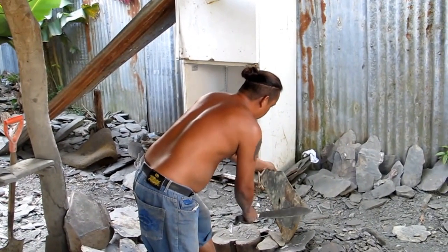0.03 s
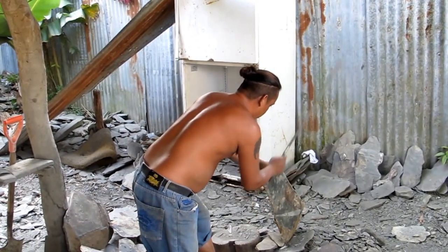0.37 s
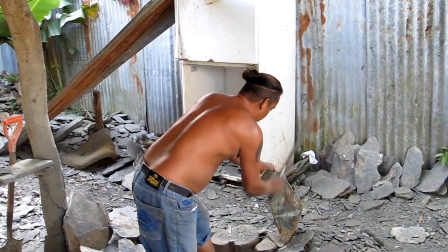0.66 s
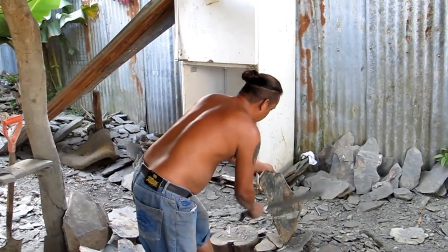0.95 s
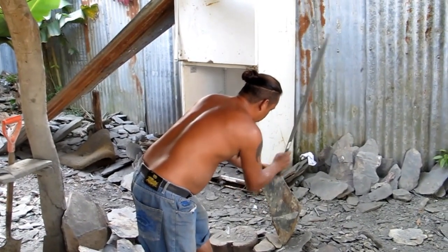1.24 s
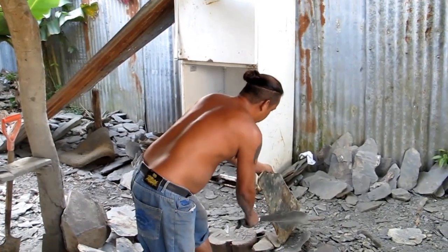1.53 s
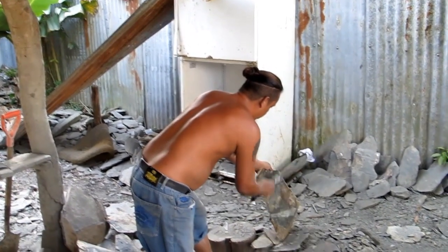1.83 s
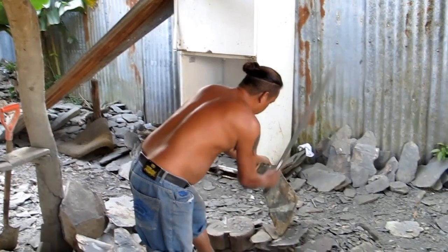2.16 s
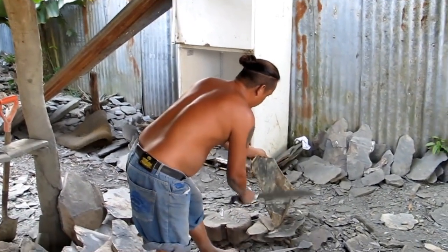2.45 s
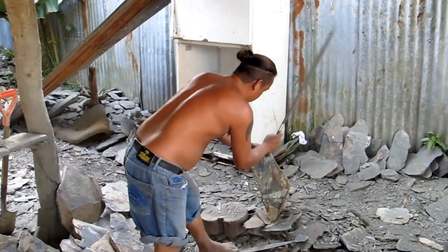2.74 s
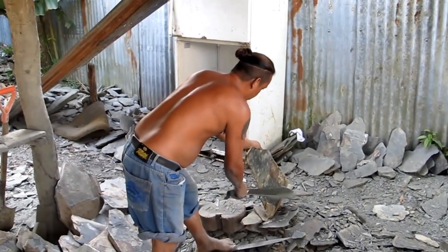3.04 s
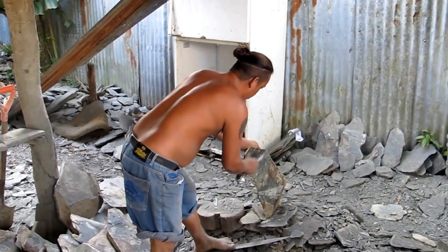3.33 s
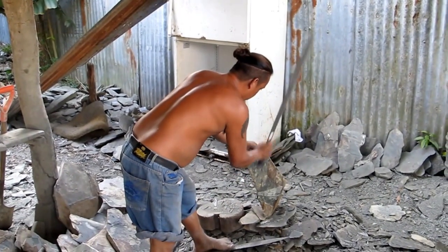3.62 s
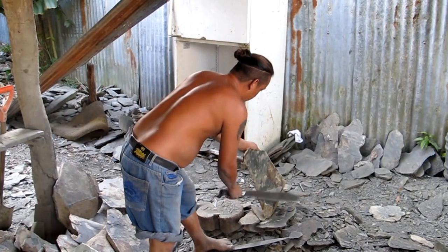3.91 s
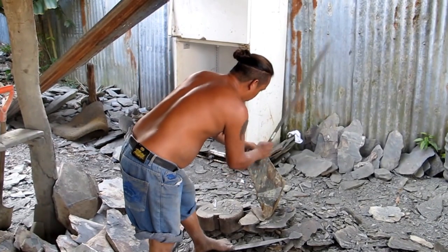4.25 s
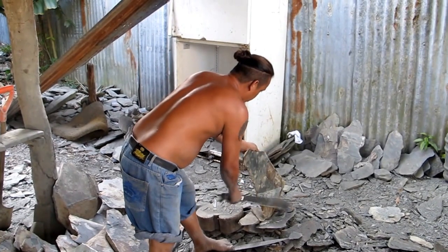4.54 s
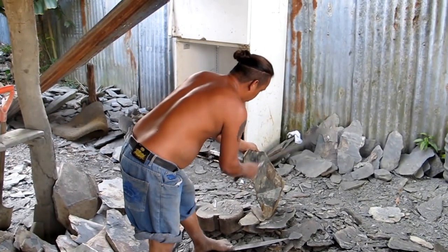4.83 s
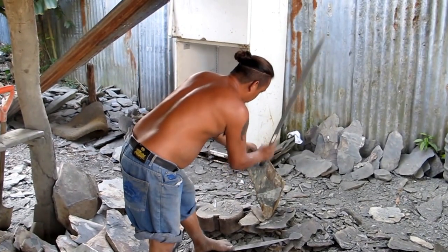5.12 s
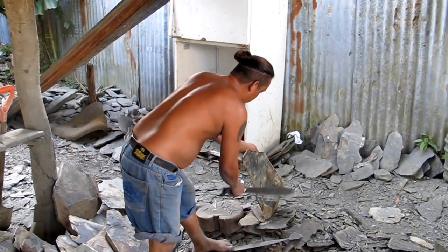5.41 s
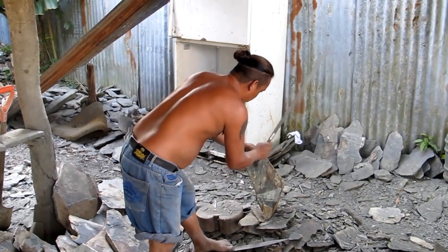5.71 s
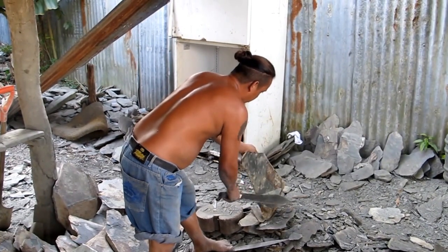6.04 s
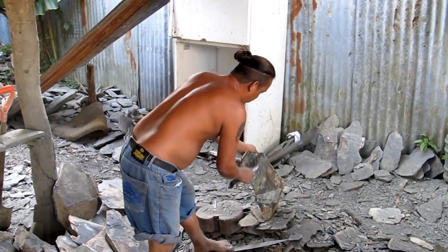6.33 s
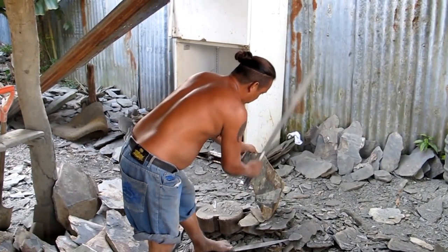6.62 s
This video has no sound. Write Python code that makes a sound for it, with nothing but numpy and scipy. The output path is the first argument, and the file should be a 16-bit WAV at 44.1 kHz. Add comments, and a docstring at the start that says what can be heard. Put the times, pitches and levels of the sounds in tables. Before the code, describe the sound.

A steel blade chops a stone slab in nine evenly paced, ringing blows outdoors, with chips pattering onto rubble.

```python
"""A long steel blade trims a hand-held slate slab near the microphone: nine evenly paced blows.
Each cracks the stone, knocks the slab and leaves the blade singing; chips patter onto the rubble,
and the yard's sheet-metal walls throw back a short tail. Far off, two birds call and an engine passes.
Towards the end a breeze buffets the two microphone ports. The recorder's gain ducks under the blows."""
import sys
import numpy as np
from scipy import signal
from scipy.fft import rfft, irfft, next_fast_len
from scipy.io import wavfile
from scipy.ndimage import map_coordinates

SR = 44100
rng = np.random.default_rng(int(sys.argv[2]) if len(sys.argv) > 2 else 0)


def to_wav(sig):
    """Store sig (one row per channel, or 1-D mono) as 16-bit WAV at the path in sys.argv[1].

    Samples outside -1..1 are clipped; the rate is SR.
    """
    pcm = np.clip(np.atleast_2d(sig), -1, 1) * 32767
    pcm = np.round(pcm).astype(np.int16)
    wavfile.write(sys.argv[1], SR, pcm.T)  # frames by channels


N = 294014

# Blows of steel on slate, levels relative: t/s, stone level/dB, thud/dB, slab ring/dB, crunch t60/s,
# crunch treble/dB, then level/dB of each of the blade's four mode families
BLOWS = [(0.0494, -13.5, 1.5, 1.5, 0.17, 1, -54.5, -56.5, -63, -37),
         (0.8451, -12, 1.5, -0.5, 0.18, 3, -63, -36.5, -30, -36),
         (1.6048, -12, 0.5, -2, 0.093, -3.5, -65, -56, -69.5, -41),
         (2.3603, -14.5, -11.5, 0, 0.15, -1, -41.5, -38.5, -55, -30),
         (3.1244, -15.5, -5.5, 7.5, 0.14, -1.5, -59.5, -43.5, -40.5, -32),
         (3.8630, -11, -11.5, -3, 0.13, 4.5, -56, -62.5, -49.5, -35),
         (4.609, -12, -1, 0.5, 0.16, 0.5, -42.5, -46, -63, -24.5),
         (5.369, -13, -6.5, 2.5, 0.11, -4.5, -48.5, -44.5, -38.5, -30.5),
         (6.0827, -14, -4.5, 2, 0.1, 6.5, -54, -42.5, -35, -36)]


def amp(db):
    """Decibels to gain."""
    return 10 ** (np.asarray(db) / 20)


def unit(x):
    """x at rms 1."""
    return x / np.sqrt(np.mean(x ** 2) + 1e-20)


def along(points, hz):
    """A curve of (f/Hz, value) points, read on a log frequency axis."""
    freqs, values = np.transpose(points)
    return np.interp(np.log(hz + 1), np.log(freqs + 1), values)


def fade(t, t60):
    """A decay that loses 60 dB in t60 seconds."""
    return amp(-60 * t / t60)


def add(track, s, sound):
    """Mix a sound into the track at time s."""
    start = max(round(s * SR), 0)
    part = sound[..., :max(N - start, 0)]
    track[..., start:start + part.shape[-1]] += part


def wobble(knots):
    """A smooth random curve, read at positions counted in knots."""
    return map_coordinates(rng.standard_normal(int(knots.max()) + 4), [knots], mode="nearest")


def noise(spectrum, size, independent=False):
    """Coloured stereo noise of rms 1; unless independent, the two ports hear the bass alike."""
    # Likeness of the sound at the two ports: f/Hz, correlation
    likeness = [(100, 0.96), (600, 0.95), (1400, 0.74), (3100, 0.19), (6800, -0.23), (15000, 0.93)]
    hz = np.fft.rfftfreq(size, 1 / SR)
    correlation = np.zeros_like(hz) if independent else along(likeness, hz)
    width = np.arccos(correlation) / 2
    coloured = rfft(rng.standard_normal((2, size))) * amp(along(spectrum, hz))
    mid, side = irfft(coloured * [np.cos(width), np.sin(width)], size)
    return unit(np.array([mid + side, mid - side]))


def tone(hz, t):
    """A sine from right of centre: it reaches the left port a little late."""
    delay_s = np.array([[5e-5], [0]])
    return np.sin(2 * np.pi * (hz * (t - delay_s) + rng.random()))


def open_air():
    """Soft outdoor noise all round the microphone, over a low rumble that drifts in level."""
    # Spectra of the air and the rumble: f/Hz, level/dB
    air_colour = [(20, -6.5), (60, 1.5), (100, -2.5), (140, -9.5), (200, -11), (400, -15.5), (650, -15.5),
                  (1000, -24), (1500, -23), (3000, -33.5), (6000, -30.5), (9000, -33.5), (15000, -32.5)]
    rumble_colour = [(25, -7.5), (70, -1), (160, -3.5), (300, -13.5), (700, -17.5), (1500, -34),
                     (6000, -63)]
    t = np.arange(N) / SR
    air = amp(-57 + 0.82 * wobble(3 * t)) * noise(air_colour, N)
    rumble = amp(-62.5 + 2.4 * wobble(5 * t)) * noise(rumble_colour, N)
    return air + rumble


def slate():
    """Close blows: a crack and a thud at contact, a crunch as the edge flakes, a short slab ring."""
    # Spectra of the stone's noises: f/Hz, level/dB
    crack_colour = [(500, -13), (2000, -14.5), (5000, -2.5), (9000, 7), (15000, -1.5)]
    thud_colour = [(60, -13), (200, -14.5), (400, -8.5), (700, 5), (1400, -8.5), (2500, -7.5), (6000, -18)]
    crunch_colour = [(100, -37.5), (300, -12), (600, -12.5), (1000, -11.5), (1600, 4), (2300, 4.5),
                     (2800, -2.5), (4000, 2), (5500, 2.5), (8000, -0.5), (15000, -1)]
    clatter_colour = [(300, -12), (900, -7.5), (1300, 1.5), (1700, -7), (2200, -8.5), (2800, -20.5),
                      (6000, -27)]
    # Modes of the slab: f/Hz, level/dB, t60/s
    slab_modes = [(536, -22, 0.068), (690.4, -15, 0.19), (814, -4.5, 0.056), (1107, -7.5, 0.13),
                  (1257, 5.5, 0.032), (1468, 1, .1), (1661, -7, 0.083), (1667, -5.5, 0.092),
                  (1920, -9, 0.11), (2106, -9.5, 0.19), (3300, -15.5, 0.063), (5400, -2, 0.056),
                  (5400, -3.5, 0.087)]
    out = np.zeros((2, N))
    t = np.arange(SR // 3) / SR
    for s, db, thud_db, slab_db, crunch_t60, treble_db, *_ in BLOWS:
        crack = amp(2.5) * fade(t, 0.039) * noise(crack_colour, len(t))
        thud = amp(thud_db - 9) * fade(t, 0.045) * noise(thud_colour, len(t))
        fractures = unit(amp(2 * wobble(900 * t)))  # the stone gives way in tiny steps
        # a cleaner break is brighter
        break_colour = [(hz, level + treble_db * (hz > 7000)) for hz, level in crunch_colour]
        crunch = amp(-0.5) * fractures * fade(t, crunch_t60) * noise(break_colour, len(t))
        # the slab's pitches shift a little with the grip, and its loose layers clatter
        ring = sum(amp(level + rng.normal(0, 2.7)) * fade(t, t60) * tone(hz * rng.normal(1, 0.01), t)
                   for hz, level, t60 in slab_modes)
        clatter = amp(2.5) * (1 - np.exp(-t / 0.015)) * fade(t, 0.13) * noise(clatter_colour, len(t))
        slab = amp(slab_db - 15) * (ring + clatter)
        attack = 1 - np.exp(-t / 0.0009)
        add(out, s, amp(db) * attack * (crack + thud + crunch + slab))
    return out


def blade():
    """The steel sings until the next contact stops it; the tones flutter once the arm swings it up."""
    # Modes of the blade: f/Hz, level/dB, t60/s
    blade_modes = [(2390, -1, 4.2), (2878, -.5, 1.8), (3359, -4.5, 1.05), (3850, -8, .24), (4288, -4, .66),
                   (4703, -6, .63), (5087, -4.5, .6), (5846, -11, .65), (6223, -6, .62), (6587, -1, .45),
                   (6132, 0, .5), (6897, -1.5, .38), (7620, -1.5, .34), (8380, -6, .3)]
    # Family of each mode, 0-3: a point of contact excites a family together
    families = [0, 1, 1, 2, 2, 2, 2, 2, 2, 2, 3, 3, 3, 3]
    swing_s, sound_m_per_s = 0.2938, 343
    out = np.zeros((2, N))
    ends = [blow[0] for blow in BLOWS[1:]] + [N / SR]
    for blow, end in zip(BLOWS, ends):
        s, family_db = blow[0], blow[-4:]
        t = np.arange(int((end - s) * SR)) / SR
        swing = np.clip(t / swing_s, 0, 1) ** 2
        travel_m = np.cumsum(1.3 + 3 * swing + 5 * t) / SR
        gate = np.clip(t / 0.002, 0, 1) * np.clip((t[-1] - t) / 0.0021, 0, 1)
        swell = amp(2 * swing + 0.14)  # the ring swells slightly just after each blow
        for (hz, db, t60), family in zip(blade_modes, families):
            # wall reflections change strength and phase with every wavelength travelled
            wavelengths = travel_m * hz / sound_m_per_s
            paths = np.array([wobble(wavelengths) + 1j * wobble(wavelengths) for port in range(2)])
            reflected = (0.35 + 0.3 * swing) * np.real(paths * np.exp(2j * np.pi * hz * t))
            direct = (0.8 - 0.35 * swing) * tone(hz, t)
            envelope = amp(db + family_db[family]) * gate * swell * fade(t, t60)
            add(out, s, envelope * (direct + reflected))
    return out


def yard(x):
    """Walls and rubble scatter the sound into a short tail, a fresh one for each blow."""
    # Reverberation of the yard: f/Hz, t60/s
    decay_times = [(150, 0.95), (700, 0.31), (1700, 0.29), (5500, 0.32), (9000, 0.47), (15000, .18)]
    tail_colour = [(200, 0.5), (1700, 6.5), (6000, 3.5), (15000, -15.5)]  # f/Hz, level/dB
    out = np.zeros((2, N))
    cuts = [0] + [round((blow[0] - 0.01) * SR) for blow in BLOWS[1:]] + [N]
    for start, end in zip(cuts, cuts[1:]):
        hz, t, bands = signal.stft(noise(tail_colour, SR // 2), SR, nperseg=256)
        envelope = fade(t, along(decay_times, hz)[:, None]) * (1 - np.exp(-t / 0.002))
        _, tail = signal.istft(bands * envelope, SR, nperseg=256)
        tail /= np.linalg.norm(tail[0])
        add(out, start / SR, signal.fftconvolve(x[:1, start:end], tail, axes=1))
    return out


def chip(db, clack_db):
    """A flake lands and rocks: a ragged tick, a few brief high modes, the clack of the stone beneath."""
    # Spectra of the flake and of the stone it hits: f/Hz, level/dB
    tick_colour = [(300, -27.5), (1500, -11), (3500, -11), (5500, 3), (9000, -1), (15000, -3)]
    clack_colour = [(200, -20), (750, 0), (2000, 0), (4000, -10), (9000, -30)]
    t = np.arange(SR // 10) / SR
    rocking = unit(amp(2.8 * wobble(350 * t)))
    tick = fade(t, 0.037) * rocking * noise(tick_colour, len(t))
    clink = 0.46 * fade(t, 0.045) * sum(tone(hz, t) for hz in rng.uniform(3000, 12000, size=4))
    clack = amp(clack_db) * fade(t, 0.06) * noise(clack_colour, len(t))
    attack = 1 - np.exp(-t / 0.0012)
    return amp(db) * attack * (tick + clink + clack)


def rubble(grains=60):
    """Below the slab, larger chips land and skip once; grit follows each blow, the later the fainter."""
    # Larger chips landing, levels relative: t/s, level/dB, clack/dB
    landings = [(0.403, -34.5, -24), (0.4199, -31, -25), (0.468, -38, -8), (0.5428, -33, -18),
                (1.173, -35.5, -29.5), (1.4058, -39, -21.5), (1.737, -25.5, -21), (1.8632, -39.5, -23.5),
                (2.5364, -28.5, -23), (2.5744, -33.5, -17), (2.6309, -33.5, -12), (2.7728, -43, -11.5),
                (3.2904, -36.5, -19), (3.4136, -38, -20), (3.4893, -34.5, -17), (4.347, -44.5, -31),
                (5.4975, -35.5, -15), (6.2446, -31, -22), (6.3826, -36, -22)]
    chip_trim_db, clack_trim_db = -2.5, 6.5
    skip_s, skip_loss_db = 0.022, 9.5
    grit_db, grit_spread_db, grit_fade_db_per_s = -52, 4, 20.5
    out = np.zeros((2, N))
    for s, db, clack_db in np.add(landings, [0, chip_trim_db, clack_trim_db]):
        add(out, s, chip(db, clack_db))
        add(out, s + skip_s * rng.uniform(0.85, 1.3), chip(db - skip_loss_db, clack_db))
    for s, *_ in BLOWS:
        falls_s = rng.uniform(0.073, 0.68, grains)
        levels_db = rng.normal(grit_db, grit_spread_db, grains) - grit_fade_db_per_s * falls_s
        for fall_s, db in zip(falls_s, levels_db):
            add(out, s + fall_s, chip(db, clack_db=-14.5))
    return out


def whistle(hz, length_s, fall):
    """A bird's thin, slightly rough note swells and fades while sliding from hz to hz * fall."""
    progress = np.linspace(0, 1, int(length_s * SR))
    pitch = hz * fall ** progress * (1 + 0.035 * wobble(60 * progress))
    return np.sin(np.pi * progress) * np.sin(2 * np.pi * np.cumsum(pitch) / SR)


def birds():
    """Two birds far from the microphone: one peeps in quick falls, the other holds lower notes."""
    # Calls of each bird: t/s, starting f/Hz, relative level/dB
    peeps = [(0.529, 3187, -61.5), (0.743, 4480, -58), (1.905, 3680, -59.5), (2.96, 3620, -62.5),
             (3.729, 4000, -69), (4.078, 2780, -65), (5.85, 3410, -63), (6.59, 3600, -62)]
    held_notes = [(0.569, 1076, -58.5), (1.071, 1037, -57.5), (2.909, 1022, -56.5)]
    out = np.zeros((2, N))
    for s, hz, db in peeps:
        add(out, s, amp(db) * whistle(hz, length_s=0.1, fall=0.65))
    for s, hz, db in held_notes:
        add(out, s, amp(db) * whistle(hz, length_s=0.14, fall=0.99))
    return out


def engine():
    """A distant engine passes: its low hum swells and fades with its nearness."""
    # Spectrum of the hum: f/Hz, level/dB
    hum_colour = [(60, -54.5), (100, -3), (112, -2), (125, -9), (190, -32), (600, -100)]
    nearest_s, half_power_s = 4.2, 0.45
    t = np.arange(N) / SR
    nearness = 1 / np.hypot(1, (t - nearest_s) / half_power_s)
    return amp(-52.5) * nearness * noise(hum_colour, N)


def wind():
    """A breeze buffets the ports, the right one harder; stronger flow sheds brighter eddies in puffs."""
    # Strength of the breeze: t/s, relative level/dB
    breeze = [(3.9, -56), (4.09, -62), (4.1, -50), (4.65, -71), (4.8, -71), (4.91, -47), (5.26, -52.5),
              (5.31, -45.5), (5.42, -54), (5.53, -39.5), (5.8, -38.5), (5.99, -33), (6.09, -41.5),
              (6.34, -47.5), (6.5, -37), (6.67, -40)]
    # Spectra of the turbulence at the ports: f/Hz, level/dB
    buffet_colour = [(15, -20.5), (40, 1), (90, 1.5), (150, -2), (250, -18), (500, -48.5), (1500, -60),
                     (5000, -110)]
    eddy_colour = [(40, -19.5), (150, 0.5), (260, -3), (500, -18), (1000, -41.5), (4000, -63.5)]
    full_gust_db, lee_db, windward_db = -35, -42, -30.5  # relative levels
    t = np.arange(N) / SR
    times, strength_db = np.transpose(breeze)
    gust_db = np.interp(t, times, strength_db) - full_gust_db
    flow_db = np.array([lee_db + 0.55 * gust_db, windward_db + 0.83 * gust_db])
    eddy_db = -31.5 + 2.12 * (flow_db - windward_db)
    lumps = unit(amp(3.4 * np.array([wobble(22 * t), wobble(22 * t)])))
    puffs = unit(amp(8 * np.tanh([wobble(65 * t), wobble(65 * t)])))
    buffet = amp(flow_db) * lumps * noise(buffet_colour, N, independent=True)
    eddies = amp(eddy_db) * puffs * noise(eddy_colour, N, independent=True)
    onset = np.clip((t - times[0]) / 0.1, 0, 1)
    return onset * (buffet + eddies)


def microphone_port(x, response, size=2048):
    """A port's treble resonance: a minimum-phase filter through (f/Hz, level/dB) points."""
    gain = amp(along(response, np.fft.rfftfreq(size, 1 / SR)))
    cepstrum = irfft(np.log(gain))
    causal_fold = np.r_[1, np.full(size // 2 - 1, 2), 1, np.zeros(size // 2 - 1)]
    impulse = irfft(np.exp(rfft(cepstrum * causal_fold)))
    return signal.fftconvolve(x, impulse)[:N]


def gain_control(x, threshold_db=-18.5, share=0.29, attack_s=0.02, recover_db_per_s=6):
    """Loud peaks turn the gain down by a share of their excess; then it creeps back up."""
    peak_db = 20 * np.log10(np.abs(x).max(axis=0) + 1e-9)
    excess_db = np.maximum(peak_db - threshold_db, 0)
    recovery_db = recover_db_per_s * np.arange(N) / SR
    duck_db = np.maximum.accumulate(share * excess_db + recovery_db) - recovery_db
    pole = np.exp(-1 / (attack_s * SR))
    return x * amp(-signal.lfilter([1 - pole], [1, -pole], duck_db))


def scene():
    """Stone and steel up close in the yard, birds and engine far off, wind on the microphone."""
    stone, chips, calls = amp(1.5) * slate(), rubble(), birds()
    echoes = yard(amp(-14.5) * stone + amp(-10) * chips + amp(-5) * calls)
    near = stone + chips + amp(3.5) * blade()
    far = amp(-9.5) * calls + amp(1.8) * (open_air() + engine())
    return near + echoes + far + amp(2.15) * wind()


def record(dry):
    """Each port colours its side; the gain ducks, peaks are rounded off and the top treble is cut."""
    # Response of each microphone port: f/Hz, level/dB
    left_port = [(600, 0), (2000, 6), (3300, 6), (4400, 6), (5200, 13.5), (6000, 13), (6700, 11.5),
                 (7400, 1), (8500, -4.5), (10000, -9), (12000, -16.5), (15000, -27.5)]
    right_port = [(600, -1), (2000, 3), (3300, 6.5), (5000, 3.5), (6300, 1), (7400, 4.5), (8800, 4.5),
                  (10200, 0), (12000, -10.5), (15000, -26.5)]
    top_hz, edge_hz = 15600, 300
    coloured = np.array([microphone_port(dry[0], left_port), microphone_port(dry[1], right_port)])
    ducked = gain_control(coloured)
    rounded = ducked / (1 + np.abs(ducked) ** 6) ** (1 / 6)
    size = next_fast_len(N + SR // 4)
    passband = np.clip((top_hz - np.fft.rfftfreq(size, 1 / SR)) / edge_hz + 0.5, 0, 1)
    return irfft(rfft(rounded, size) * passband, size)[:, :N]


dry = scene()
out = record(dry)
to_wav(out)
```